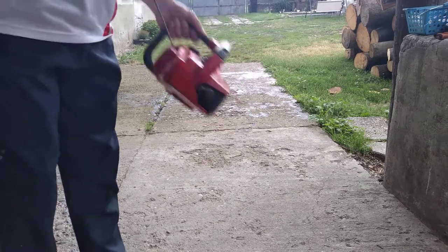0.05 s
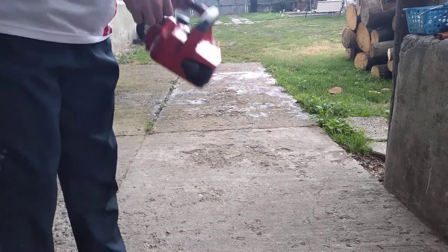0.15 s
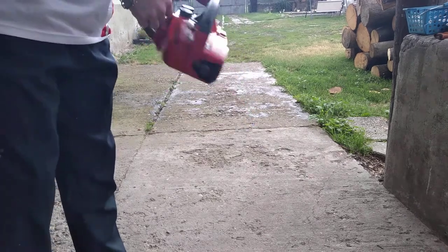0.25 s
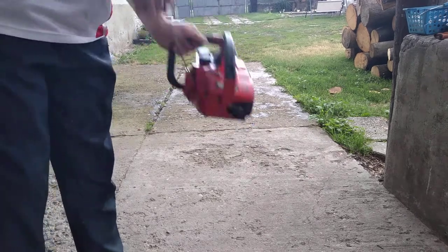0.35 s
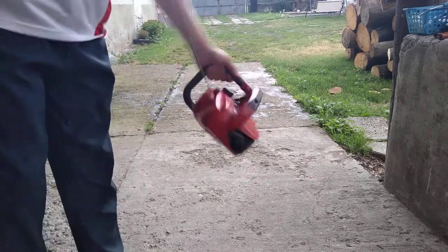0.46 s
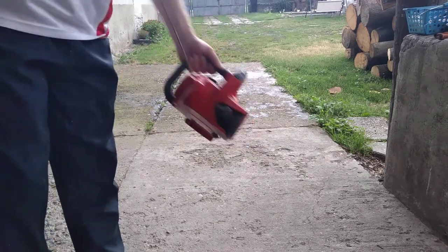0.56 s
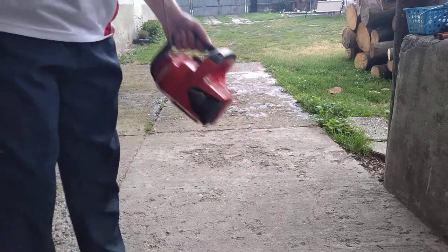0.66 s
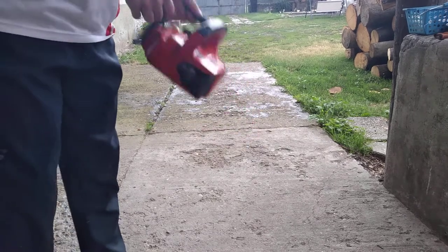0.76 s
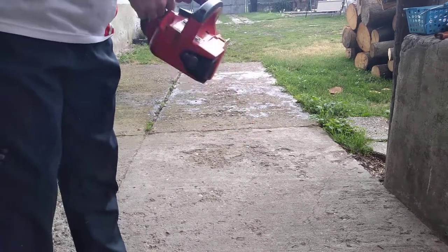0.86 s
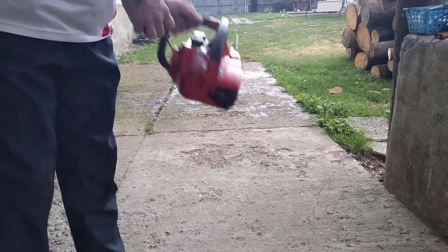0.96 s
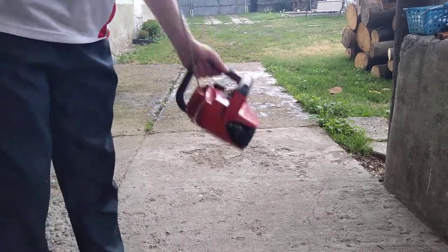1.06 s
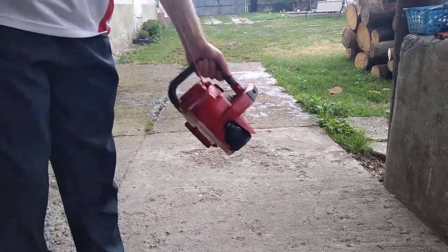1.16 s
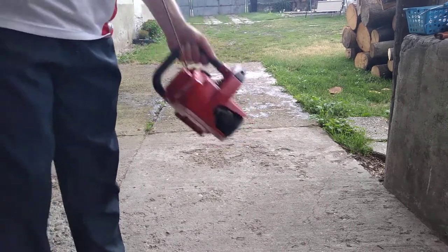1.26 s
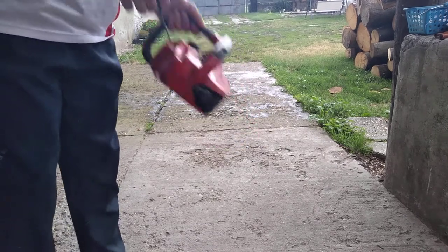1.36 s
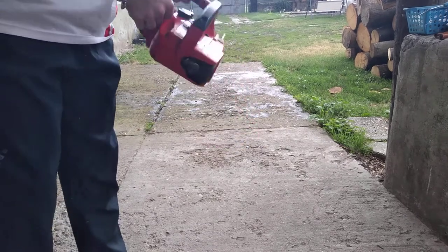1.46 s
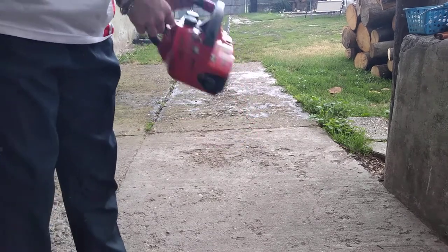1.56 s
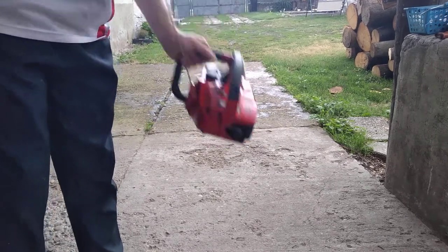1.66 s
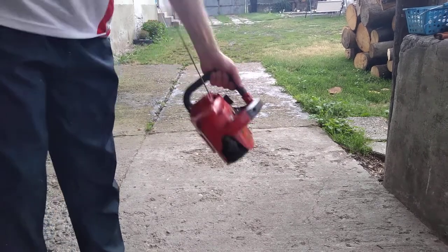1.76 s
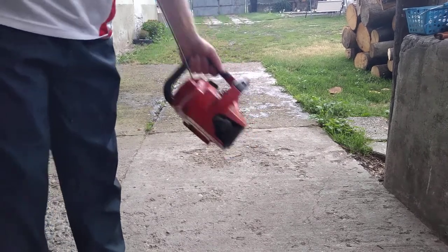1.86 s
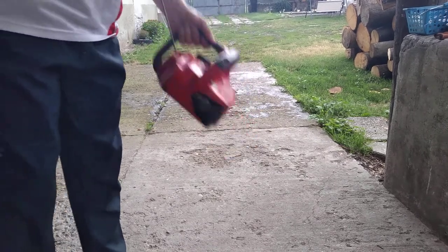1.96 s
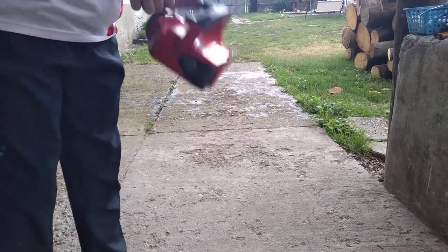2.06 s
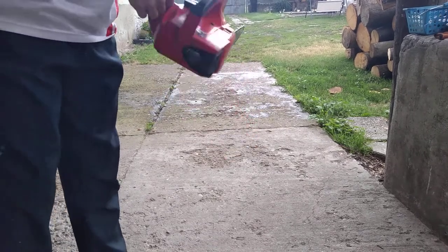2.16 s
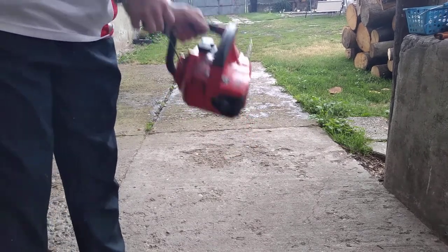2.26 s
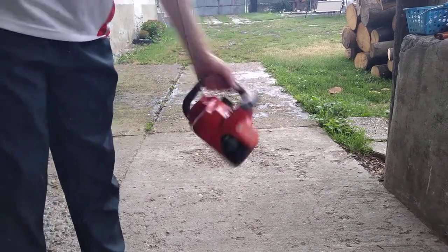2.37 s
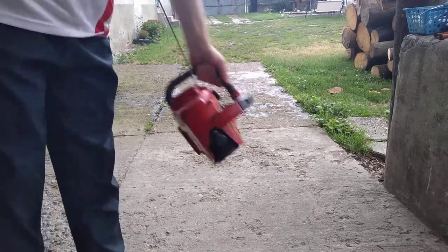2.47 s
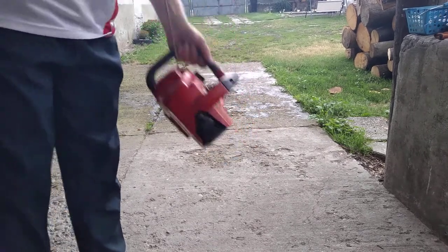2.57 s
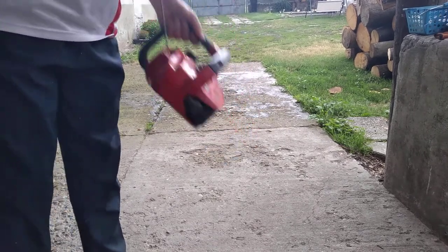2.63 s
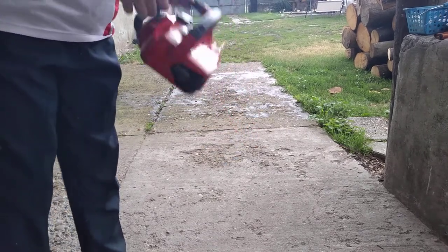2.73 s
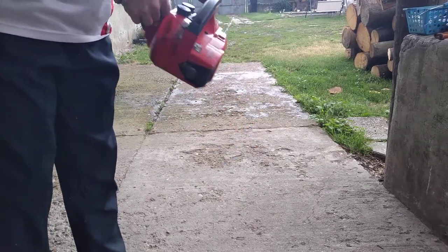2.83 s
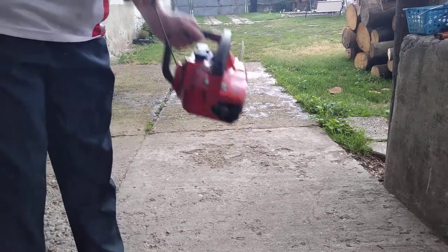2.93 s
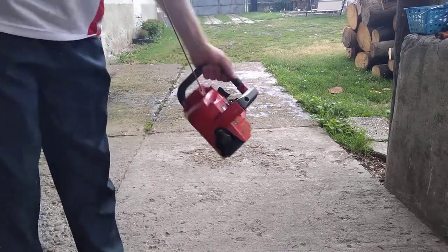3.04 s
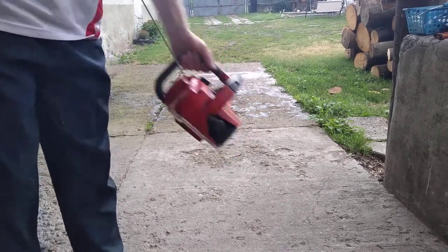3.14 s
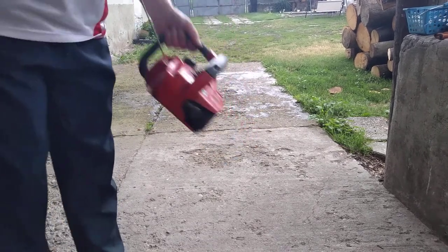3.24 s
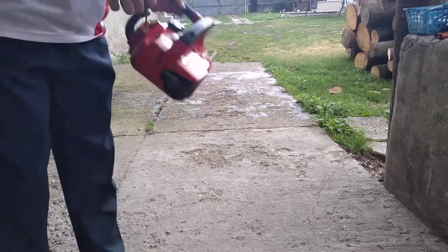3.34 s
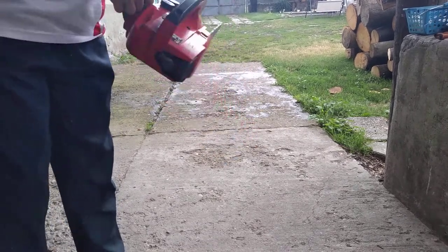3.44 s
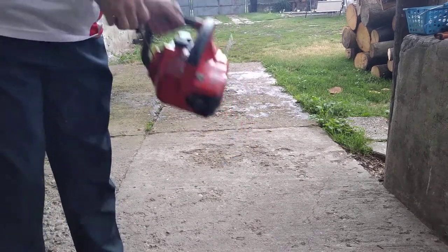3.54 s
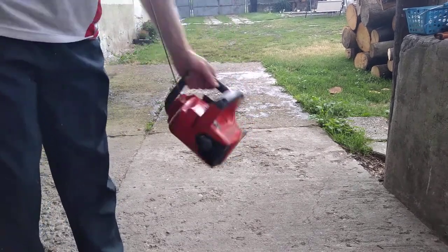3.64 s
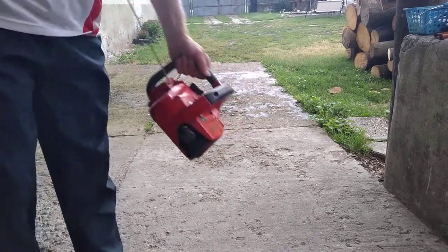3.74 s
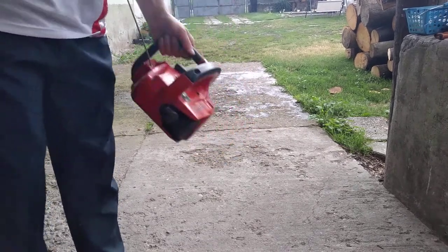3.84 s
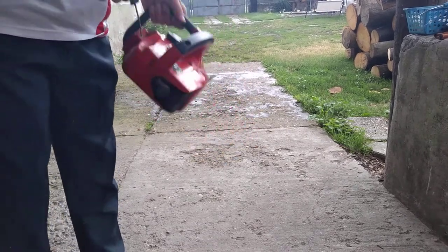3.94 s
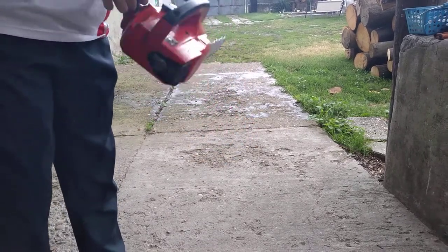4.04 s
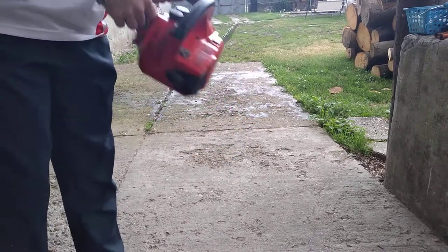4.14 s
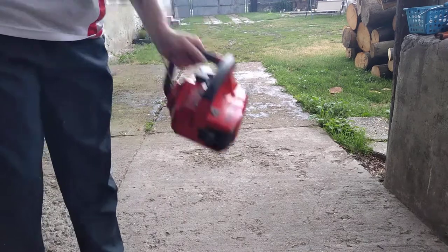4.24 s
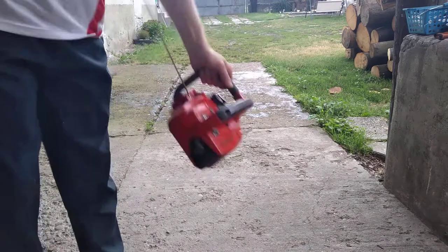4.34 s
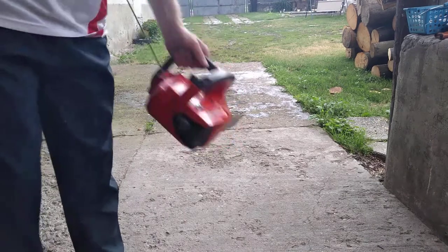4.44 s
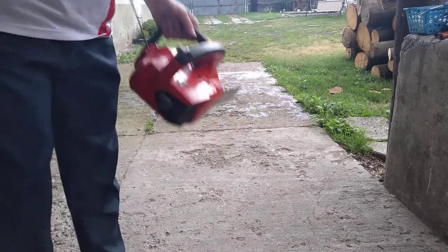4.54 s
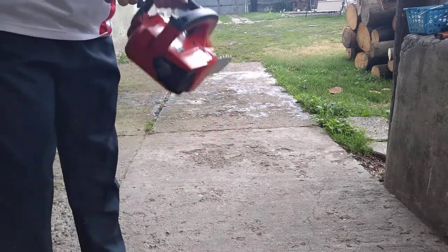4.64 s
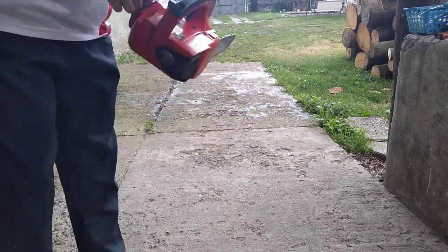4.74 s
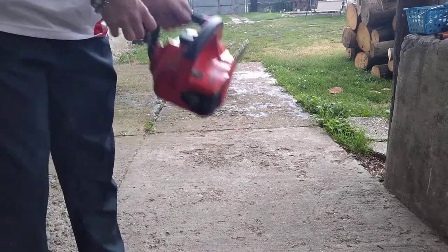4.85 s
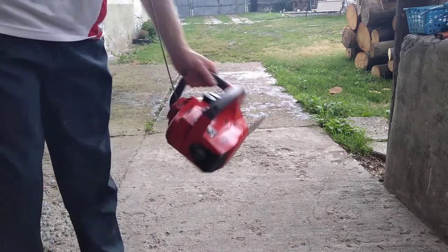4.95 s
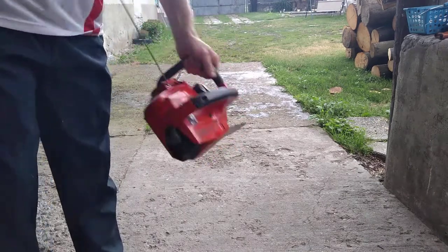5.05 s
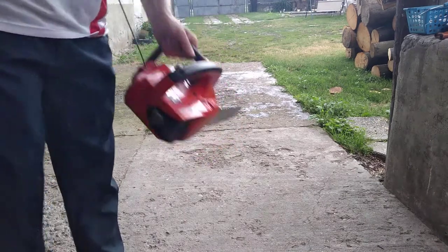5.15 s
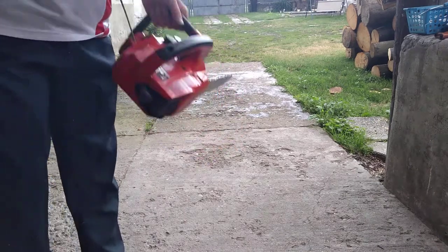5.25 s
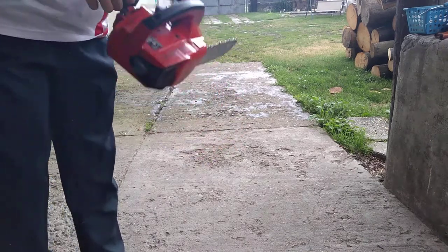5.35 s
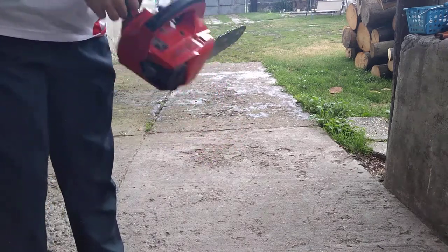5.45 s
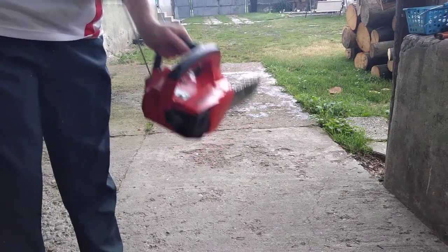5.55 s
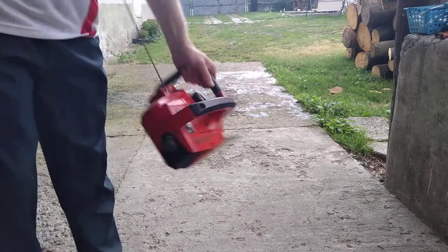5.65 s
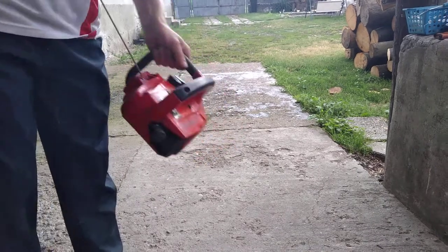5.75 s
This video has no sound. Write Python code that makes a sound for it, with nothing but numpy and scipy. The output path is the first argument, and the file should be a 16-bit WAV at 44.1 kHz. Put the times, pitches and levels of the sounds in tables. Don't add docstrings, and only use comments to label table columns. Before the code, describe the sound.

Repeated starter pulls on a small two-stroke saw in a concrete yard: low muffled puffs, metallic clatter, zippy ratcheting rewinds, no ignition.

```python
import sys
import numpy as np
from scipy import signal
from scipy.fft import rfft, irfft
from scipy.io import wavfile
from scipy.ndimage import uniform_filter1d, map_coordinates

SR = 44100
rng = np.random.default_rng(int(sys.argv[2]) if len(sys.argv) > 2 else 0)


def makeup_ratio(level_db):
    decades = np.asarray(level_db, float) / 20
    return 10 ** decades


def digitize_waveform(pressure):
    field = np.atleast_2d(pressure).T
    bounded = np.clip(field, -1, 1)
    quanta = np.round(bounded * 32767).astype(np.int16)
    wavfile.write(sys.argv[1], SR, quanta)


N = 255780

# (frequency [Hz], density [dB per Hz])
YARD_SPECTRUM = [(40, -24), (90, -3.5), (400, -12), (540, 1.5), (2910, -7), (4300, -23), (7120, -12),
                 (14500, -30)]
# (pawls engage [s], engaging knock [dB], yank [dB], coasting [dB], crank stops [s])
PULLS = [
    (0.3171, -37, -35, -40, 0.67),
    (0.9635, -42, -43, -35, 1.216),
    (1.6054, -31, -32.5, -54, 1.94),
    (2.244, -37.5, -35.5, -35.5, 2.492),
    (2.9093, -33.5, -31, -63, 3.31),
    (3.551, -26, -33.5, -41, 3.9),
    (4.207, -32.5, -34, -41, 4.627),
    (4.858, -68, -38, -42.5, 5.19),
    (5.5117, -35.5, -37, -36.5, 6.26),
]
# (full speed [s], handle home [s], rasp at full speed [dB], rasp at home [dB],
# spring brightness [dB])
REWINDS = [
    (0.0, 0.16, -37, -47.5, -1),
    (0.725, 0.799, -48.5, -55, -2),
    (1.33, 1.419, -39.5, -40, 2.5),
    (1.92, 2.084, -38.5, -42, -2.5),
    (2.607, 2.74, -44.5, -43.5, 0),
    (3.169, 3.38, -41, -44.5, -0.5),
    (3.889, 4.04, -53, -54.5, -5),
    (4.55, 4.598, -61, -59.5, 7),
    (5.317, 5.351, -46.5, -51, 2.5),
    (5.772, 5.805, -58, -33.5, -1),
]
# (time [s], metal [dB], plastic case [dB], bright crack [dB])
KNOCKS = [(0.167, -47.5, -63, -71), (0.203, -75, -44.5, -78), (0.4258, -37.5, -36, -33.5),
          (0.557, -42.5, -36, -42.5), (0.639, -42, -46, -47.5), (1.098, -41, -57, -42.5),
          (1.16, -40, -36, -40.5), (1.436, -55, -35.5, -75), (4.7092, -82, -46.5, -85),
          (1.7456, -40, -41, -34), (1.807, -39.5, -41, -42), (1.888, -59, -36.5, -61),
          (2.2945, -48.5, -59, -42), (2.3983, -38, -35, -35), (2.463, -42.5, -54, -43.5),
          (2.5664, -46.5, -47, -80), (3.044, -38.5, -41, -36.5), (3.1645, -42, -39, -51),
          (3.6406, -35.5, -32, -32.5), (3.7711, -41, -58, -33), (4.308, -36.5, -36, -28.5),
          (4.4655, -45, -38.5, -40), (4.605, -63, -35.5, -84), (4.765, -53, -59, -74),
          (4.9305, -32.5, -28, -32), (4.99, -39.5, -39, -36), (5.0602, -46.5, -62, -39),
          (5.18, -52, -37, -64), (5.652, -37, -64, -31), (5.762, -42, -42, -41.5)]
# (time [s], level [dB])
TICKS = [(0.1255, -27), (0.7003, -35), (0.7334, -28), (0.7504, -27.5), (0.7672, -24.5), (1.122, -29),
         (1.272, -32), (1.308, -25), (4.7668, -34), (2.294, -40), (2.491, -31), (2.6494, -24.5),
         (2.984, -40), (3.105, -36), (3.1237, -30), (3.2321, -34), (3.6097, -24), (3.8691, -38),
         (3.8955, -37), (3.917, -31), (3.9444, -34.5), (3.9736, -34), (4.0088, -30), (4.0339, -30.5),
         (4.3956, -35.5), (4.5373, -36), (4.5697, -29), (5.2125, -34), (5.2692, -30.5), (5.3971, -34.5)]
# (time [s], level [dB])
DRIVEN_PUFFS = [(0.3926, -15), (0.426, -20), (0.4539, -24), (1.041, -16), (1.0825, -18), (1.1224, -18),
                (1.6853, -12.5), (1.7221, -12), (1.7596, -19.5), (2.2986, -16), (2.3456, -12.5),
                (2.3805, -11), (2.9854, -14), (3.021, -15.5), (3.0592, -19), (3.608, -11), (3.6413, -19),
                (3.6706, -25), (4.279, -15.5), (4.3105, -28), (4.3359, -21.5), (4.9302, -20), (4.961, -20),
                (4.9916, -23.5), (5.5849, -15.5), (5.6221, -17.5), (5.654, -18.5)]
COASTING_PUFFS = [0.4819, 0.517, 0.5607, 0.5984, 0.6554, 1.178, 2.419, 2.4775, 3.699, 3.7324, 3.7747, 3.818,
                  4.364, 4.3971, 4.4294, 4.4683, 4.503, 4.5488, 5.0256, 5.0605, 5.0926, 5.1302, 5.6867,
                  5.7228, 5.7815]
# (frequency [Hz], width [Hz], level [dB])
MUFFLER = [(88.2, 14.3, -1.5), (168.7, 16.3, 7), (230.3, 100, -2), (314, 8.5, -3.5), (389.2, 24.5, -9.5)]
# (frequency [Hz], width [Hz], level [dB])
CASE = [(559.4, 38.5, 3), (621.4, 37.7, 1.5), (855, 170, -2), (939, 196, -5.5), (1282, 390, -9.5)]
# (frequency [Hz], width [Hz], level [dB])
REEL = [(2124, 386, 0), (3185, 560, -2), (3875, 150, 4.5), (4606, 690, 0.5), (5100, 82, -31),
        (5760, 780, -18), (6240, 14000, -16)]
# (frequency [Hz], width [Hz], level [dB])
SPRING = [(8210, 240, -2), (10144, 160, -1.5), (11070, 710, 2), (12000, 3440, -0.5), (13420, 1140, 3)]
# (frequency [Hz], width [Hz], level [dB])
PAWL = [(6227, 480, 0.11), (6765, 1190, -3.1)]
# (frequency [Hz], width [Hz], level [dB])
SQUEAL = [(4390, 37, 3), (5050, 39, -10), (4950, 25, -27), (5460, 30, 16.5), (9970, 72, -3),
          (11000, 42, -14), (12100, 60, -15), (13500, 60, -3)]
# (frequency [Hz], width [Hz], level [dB])
COVER = [(545, 56, -2), (599, 44, -1)]
# (frequency [Hz], level [dB], T60 [s])
BAR = [(3200, -39, 0.064), (4450, -1, 0.093), (4750, -20, 0.072), (5130, 4.5, 0.082), (5550, -12, 0.035),
       (12300, 13, 0.054), (11750, 5.5, 0.12)]

YARD_DB = -65
GROUND_S, GROUND_DB = .0028, -8
ECHO_T60_S, ECHO_DB, ECHO_CUT_HZ = .17, -16, 12000
BOOM_DB, BOOM_HZ = -14.5, 271
SWING_HZ = 1.5
PORT_LAG = 21
COAST_PUFF_DB, COAST_SPREAD_DB = -22.5, .8
ENGAGE_METAL_DB, ENGAGE_CRACK_DB = -11.5, -13.5
YANK_S, YANK_HOLD_S, COAST_FROM_S = 0.077, 0.013, 0.1
SPIN_UP_DB_PER_S, YANK_FADE_DB_PER_S, STOP_DB_PER_S, COAST_RISE_DB = 318, 120, 191, 3
DRAG_DB, DRAG_SAG_DB = -47, -15.5
RATTLE_YANK_DB, RATTLE_COAST_DB, RATTLE_REWIND_DB = 0.5, -9, -2.5
BRIGHT_DB, BRIGHT_SLOPE = -43.5, 1.54
STILL_AIR_DB, STILL_RATTLE_DB, STILL_RASP_DB = -77, -78.5, -71
TICK_WITH_KNOCK_DB, TICK_WITH_PUFF_DB = 7.5, -28
TEETH_PER_S, TEETH_SPREAD_DB, TEETH_DB = 70.0, 2.9, 4
REWIND_RISE_DB_PER_S, REWIND_FADE_DB_PER_S, CASE_FADE_DB_PER_S = 112, 289, 184
COVER_DB, COVER_FADE_DB_PER_S = -12.5, 81


def rms_one(x):
    return x / np.sqrt(np.mean(x ** 2) + 1e-20)


def clicks(seconds, sizes):
    out = np.full(N, 1e-18)
    at = (np.asarray(seconds) * SR).astype(int)
    out[np.minimum(at, N - 1)] = sizes
    return out


def resonate(x, peaks):
    out = 0
    for k, (hz, width_hz, db) in enumerate(peaks):
        r = np.exp(-np.pi * width_hz / SR)
        feed = [(1 - r * r) / 2, 0, (r * r - 1) / 2]
        back = [1, -2 * r * np.cos(2 * np.pi * hz / SR), r * r]
        out = out + (-1) ** k * makeup_ratio(db) * signal.lfilter(feed, back, x)
    return out


def highpass(x, hz):
    return signal.sosfilt(signal.butter(2, hz, "high", fs=SR, output="sos"), x)


def dying(x, t60):
    return signal.lfilter([1], [1, -makeup_ratio(-60 / (t60 * SR))], x)


def flutter(rate_hz, depth_db):
    smoother = signal.butter(2, rate_hz, fs=SR, output="sos")
    slow = signal.sosfilt(smoother, rng.standard_normal(N + SR))[SR:]
    return makeup_ratio(depth_db * rms_one(slow))


def grit(per_s, spread_db):
    sizes = makeup_ratio(spread_db * rng.exponential(size=N).clip(max=5))
    signs = np.sign(rng.random(N) - .5)
    return sizes * signs * (rng.random(N) < per_s / SR)


def plateaus(starts, ends, start_db, end_db, rise_db_per_s, fall_db_per_s):
    t = np.arange(0, N + 64, 64) / SR
    columns = np.broadcast_arrays(starts, ends, start_db, end_db)
    start, end, a, b = [np.reshape(v, (-1, 1)) for v in columns]
    db = a + (b - a) * np.clip((t - start) / (end - start), 0, 1)
    db = db - rise_db_per_s * np.clip(start - t, 0, 9) - fall_db_per_s * np.clip(t - end, 0, 9)
    return np.interp(np.arange(N) / SR, t, makeup_ratio(db).sum(axis=0))


def yard_hum():
    hz, db = np.transpose(YARD_SPECTRUM)
    log_hz = np.log(np.arange(N // 2 + 1) * SR / N + 1)
    spectrum = rfft(rng.standard_normal((2, N))) * makeup_ratio(np.interp(log_hz, np.log(hz), db))
    return makeup_ratio(YARD_DB) * rms_one(irfft(spectrum, N))


def rewind(bright_share=0, fade_db_per_s=REWIND_FADE_DB_PER_S):
    full, home, full_db, home_db, bright_db = np.transpose(REWINDS)
    extra_db = bright_share * bright_db
    return plateaus(full, home, full_db + extra_db, home_db + extra_db, REWIND_RISE_DB_PER_S, fade_db_per_s)


def efforts():
    s, _, yank_db, coast_db, stop = np.transpose(PULLS)
    top = s + YANK_S
    yank = plateaus(top, top + YANK_HOLD_S, yank_db, yank_db, SPIN_UP_DB_PER_S, YANK_FADE_DB_PER_S)
    coast = plateaus(s + COAST_FROM_S, stop, coast_db, coast_db + COAST_RISE_DB,
                     SPIN_UP_DB_PER_S, STOP_DB_PER_S)
    drag = plateaus(top, stop, DRAG_DB, DRAG_DB + DRAG_SAG_DB, SPIN_UP_DB_PER_S, STOP_DB_PER_S)
    air = yank + coast + makeup_ratio(STILL_AIR_DB)
    rattle = makeup_ratio(RATTLE_YANK_DB) * yank + makeup_ratio(RATTLE_COAST_DB) * coast
    rattle = rattle + makeup_ratio(RATTLE_REWIND_DB) * rewind(0, CASE_FADE_DB_PER_S) + makeup_ratio(STILL_RATTLE_DB)
    rasp, shine = [drag + rewind(share) + makeup_ratio(STILL_RASP_DB) for share in (0, 1)]
    air, rattle, rasp, shine = 20 * np.log10([air, rattle, rasp, shine])
    return air, rattle, rasp, BRIGHT_DB + BRIGHT_SLOPE * (shine + 40)


def friction():
    air, rattle, rasp, bright = efforts()
    turn_s = np.r_[np.transpose(DRIVEN_PUFFS)[0], COASTING_PUFFS] - .007
    turns = 0.57 + dying(clicks(turn_s, 0.91), 0.023)
    turns = uniform_filter1d(turns, size=SR // 200) / uniform_filter1d(turns, size=SR // 16)
    skip = rasp + np.clip(0.51 * (rasp - air) - 9, -14, -1.5)
    tooth_phase = np.cumsum(78 * flutter(8.2, 1.4)) / SR % 1
    teeth = 5.1 * np.exp(-4.2 * tooth_phase)
    shared = flutter(64, 2.2)
    layers = [(air - 4, turns, MUFFLER, 900),
              (rattle - .6, turns, CASE, 2500),
              (rasp - 1.2, 1, REEL, 7000),
              (skip, teeth, PAWL, 9000),
              (bright + 7.1, 1, SPRING, 9000)]
    out = 0
    for db, gate, body, per_s in layers:
        contacts = grit(per_s, 3.27)
        sound = 0
        for k, peak in enumerate(body):
            sound = sound + (-1) ** k * flutter(32.5, 2.8) * resonate(contacts, [peak])
        if body is not MUFFLER:
            sound = highpass(sound, 440)
        out = out + makeup_ratio(db) * gate * rms_one(shared * sound)
    rub = grit(8000, 1.8)
    squeal = sum(flutter(9, 6) * resonate(rub, [note]) for note in SQUEAL)
    return out + makeup_ratio(skip - 6) * rms_one(squeal)


def reel_cover():
    drumming = resonate(resonate(grit(1500, 2.8), COVER), [(570, 250, 0)])
    return makeup_ratio(COVER_DB) * rewind(0, COVER_FADE_DB_PER_S) * flutter(20, 2.3) * rms_one(drumming)


def blows_struck():
    engaging = [(s, db + ENGAGE_METAL_DB, db, db + ENGAGE_CRACK_DB) for s, db, *_ in PULLS]
    return np.transpose(engaging + KNOCKS)


def ratchet():
    tick_s, tick_db = np.transpose(TICKS)
    knock_s, metal_db = blows_struck()[:2]
    puff_s, puff_db = np.transpose(DRIVEN_PUFFS)
    lesser = np.abs(grit(TEETH_PER_S, TEETH_SPREAD_DB)) * makeup_ratio(TEETH_DB) * rewind()
    teeth = clicks(tick_s, makeup_ratio(tick_db)) + lesser
    teeth = teeth + clicks(knock_s, makeup_ratio(metal_db + TICK_WITH_KNOCK_DB))
    teeth = teeth + clicks(puff_s, makeup_ratio(puff_db + TICK_WITH_PUFF_DB))
    tick = dying(teeth, 0.018) * rms_one(resonate(grit(11000, 1.46), PAWL))
    shake = dying(teeth, 0.021) * rms_one(resonate(rng.standard_normal(N), CASE + REEL[:2] + SPRING))
    return tick + makeup_ratio(-5.5) * shake


def knocks():
    s, metal_db, case_db, crack_db = blows_struck()
    bodies = [(case_db, CASE, .06, 5),
              (metal_db, REEL, .065, 7),
              (crack_db, SPRING, .055, 10)]
    out = 0
    for db, body, t60, trim_db in bodies:
        blows = clicks(s, makeup_ratio(db + trim_db - 4.5))
        envelope = dying(blows, t60) + 1.56 * dying(blows, 0.021)
        envelope = signal.lfilter([.03], [1, -.97], envelope)
        out = out + envelope * rms_one(resonate(grit(5000, 2.86), body))
    strengths = rng.normal(0, 4, (len(s), len(BAR)))
    for (hz, db, t60), own_db in zip(BAR, strengths.T):
        struck_db = metal_db if hz < 8000 else crack_db
        blow = clicks(s, makeup_ratio(struck_db + db + own_db - 9))
        out += dying(blow, t60) * np.sin(2 * np.pi * hz * np.arange(N) / SR)
    return highpass(out, 430)


def puffs():
    s, db = np.transpose(DRIVEN_PUFFS)
    soft_db = COAST_PUFF_DB + COAST_SPREAD_DB * rng.standard_normal(len(COASTING_PUFFS))
    return np.r_[s, COASTING_PUFFS], np.r_[db, soft_db]


def exhaust():
    s, db = puffs()
    port = clicks(s, makeup_ratio(db))
    t = np.arange(-SR // 500, SR // 500 + 1) / SR
    t = t / 0.00023
    push = np.exp(-(t + 1.395) ** 2) * 0.79 - np.exp(-t ** 2) * 1.222
    pulse = np.convolve(port, push, "same")
    ringing = 5.45 * resonate(pulse, MUFFLER) + 0.35 * resonate(pulse, CASE)
    hiss = dying(port, 0.036) * rms_one(resonate(rng.standard_normal(N), CASE[2:] + REEL[:1]))
    return makeup_ratio(1.0) * pulse + ringing + makeup_ratio(-16.0) * hiss


def echoes():
    delays, sides, signs = rng.random(size=(3, 200))
    delays = .004 + delays ** 1.4 * ECHO_T60_S * .8
    sizes = np.sign(signs - .5) * makeup_ratio(ECHO_DB - 60 * delays / ECHO_T60_S)
    response = np.zeros((2, SR // 2))
    for port, way in enumerate([1, -1]):
        at = (delays * SR + way * (sides - .5) * PORT_LAG).astype(int)
        np.add.at(response[port], at, sizes)
    boom = resonate(response[0], [(BOOM_HZ, 170, BOOM_DB)]) * [[1], [-1]]
    band = signal.butter(1, [420, ECHO_CUT_HZ], "band", fs=SR, output="sos")
    return signal.sosfilt(band, response) + boom


def yard(x):
    t = np.arange(N)
    ground = makeup_ratio(GROUND_DB) * np.roll(x, int(GROUND_S * SR))
    heard = x + ground + np.zeros((2, 1))
    place = t / SR * SWING_HZ * 2.3
    for k in range(5):
        distance = np.abs((place - k + 2.5) % 5 - 2.5)
        near = np.sqrt(np.clip(1 - distance, 0, 1))
        heard += signal.fftconvolve(near * x[None], echoes(), axes=1)[:, :N]
    lag = 1.11 + 1.86 * np.sin(2 * np.pi * SWING_HZ * t / SR)
    return np.array([heard[0], map_coordinates(heard[1], [t - lag], order=3)])


def scene():
    saw = friction() + reel_cover() + ratchet() + knocks() + exhaust()
    return yard(saw) + yard_hum()


def roll_off(x):
    return signal.sosfilt(signal.butter(12, 15610, fs=SR, output="sos"), x)


def record(dry):
    dry = dry - resonate(dry, [(12500, 1940, -0.5)]) * [[0], [1]]
    blur, cancel = .25, .95
    late = signal.lfilter([0] * (PORT_LAG - 1) + [blur, 1 - 2 * blur, blur], [1], dry[::-1])
    pole, zero = np.exp(-2 * np.pi * np.array([110, 600]) / SR)
    aimed = makeup_ratio(-4.5) * signal.lfilter([1, -zero], [1, -pole], dry - cancel * late)
    aimed = highpass(aimed, 62)
    aimed = signal.sosfilt(signal.ellip(6, 1, 42, 14250, fs=SR, output="sos"), aimed)
    return roll_off(aimed * makeup_ratio([[.3], [-.3]]))


dry = scene()
out = record(dry)
digitize_waveform(out)
```